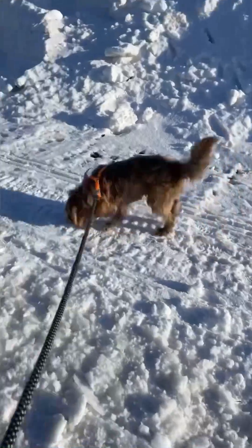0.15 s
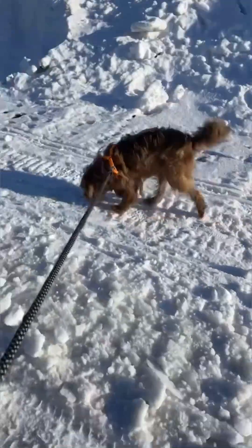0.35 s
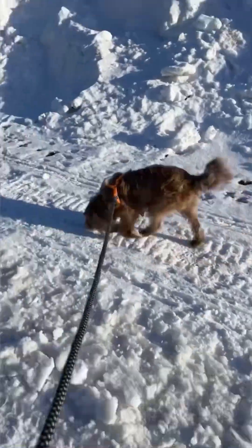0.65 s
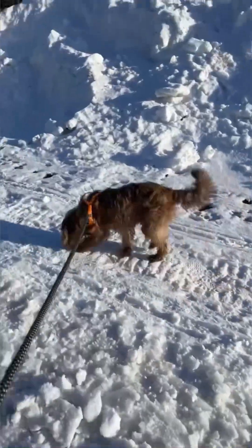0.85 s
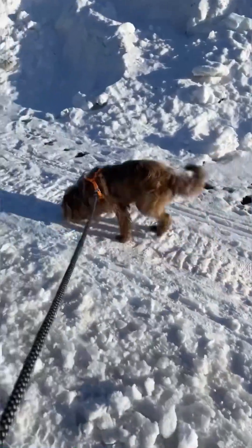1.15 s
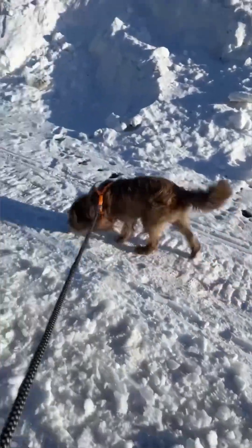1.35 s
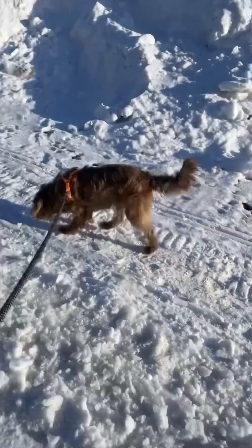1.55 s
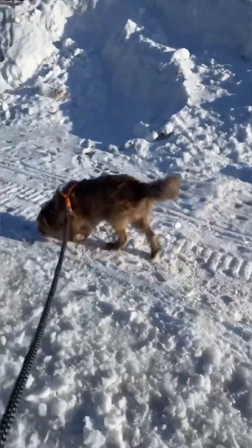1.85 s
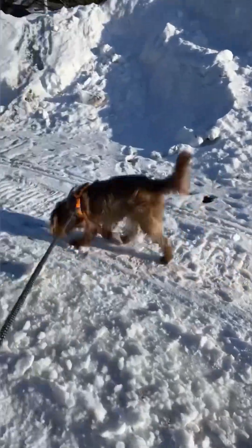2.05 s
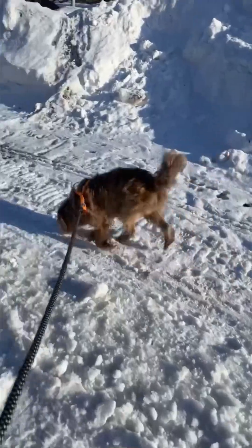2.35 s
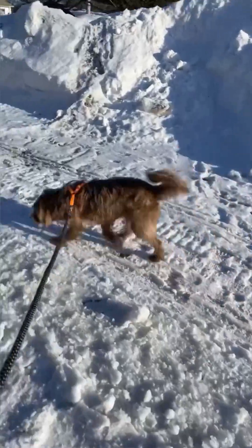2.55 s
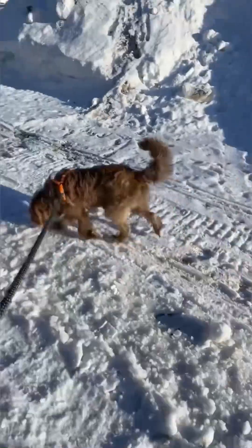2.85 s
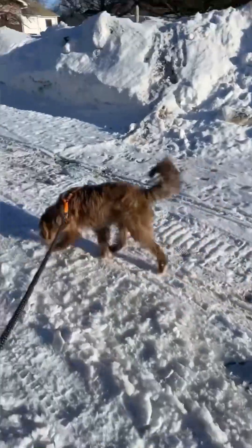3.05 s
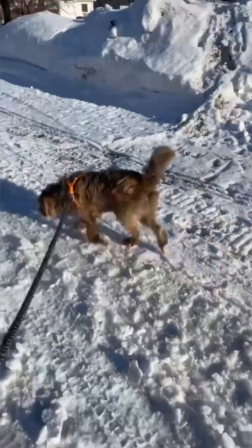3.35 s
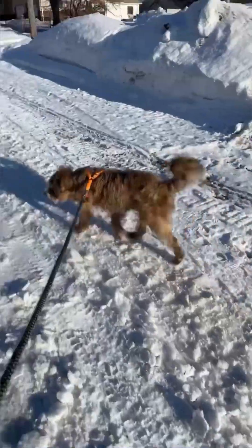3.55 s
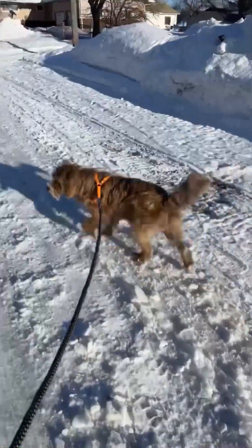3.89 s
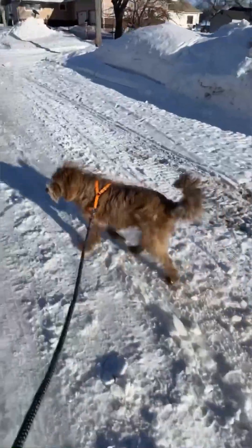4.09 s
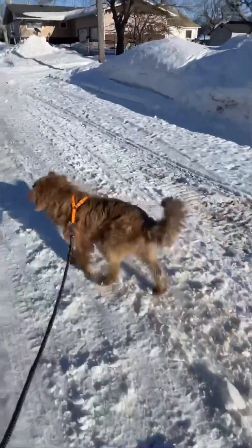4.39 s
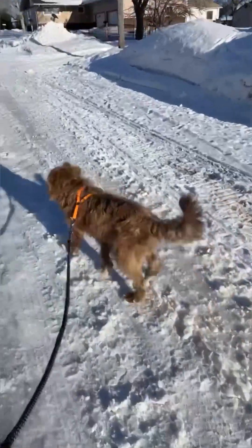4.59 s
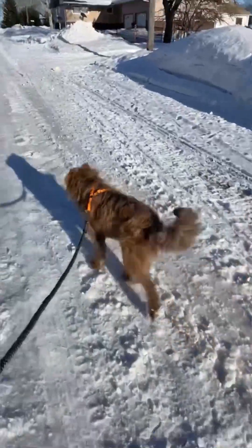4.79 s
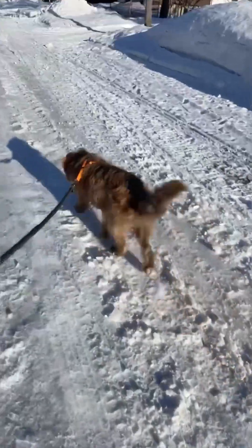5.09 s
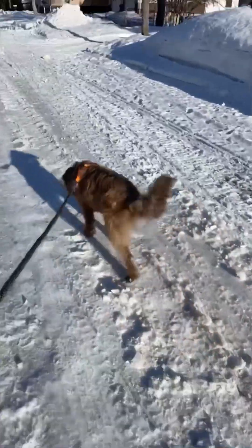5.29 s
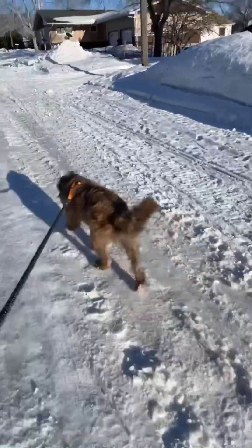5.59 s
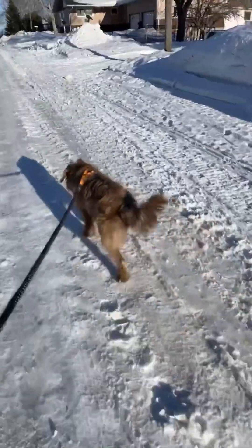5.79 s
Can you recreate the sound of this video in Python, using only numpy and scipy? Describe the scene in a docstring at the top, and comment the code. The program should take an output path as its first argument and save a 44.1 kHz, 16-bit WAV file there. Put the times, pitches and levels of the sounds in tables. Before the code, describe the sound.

Steady walking on a packed snowy road, heard on a handheld phone. Each boot gives a gritty crunch with sharp crust snaps and powdery hiss, then small scuffs. A coat swishes between steps, air rumbles softly, and a faint far engine hums low. The loudest crack comes near 3.8 seconds; the last steps are softer. Open air, no echo.

```python
"""Boots walk a road of cold packed snow, heard from a phone in the hand.
Each boot crushes crust, grit and powder as swarms of tiny random fractures under a swelling load.
Lumps snap in single quick swings of pressure, and ice chips ring in short bursts of high modes.
Between them lie filtered noises: a winter coat swishes, loose snow shuffles, air rumbles on the microphone.
A far engine hums as one sine that slowly rises in pitch."""
import sys
import numpy as np
from scipy import signal
from scipy.fft import rfft, irfft, next_fast_len
from scipy.io import wavfile
from scipy.ndimage import uniform_filter1d

SR = 44100
rng = np.random.default_rng(int(sys.argv[2]) if len(sys.argv) > 2 else 0)


def persist_wave(psi):
    """Save psi, clipped to +-1, as 16-bit WAV."""
    counts = np.round(np.clip(psi, -1, 1) * 32767).astype(np.int16)
    wavfile.write(sys.argv[1], SR, np.atleast_2d(counts).T)


N = 261513
TIME = np.arange(N) / SR
TOP_HZ = 16000  # upper limit of the phone

# Footfalls of the boots. Each row: full load in seconds, rise in seconds, fall in seconds, crust in dB,
# grit in dB, powder in dB, crust pitch in Hz, typical strength in dB of the push-off lumps before it.
FOOTFALLS = [(.229, 0.083, 0.046, -21.5, -23.5, -21.5, 902.3, -33),
             (0.846, 0.038, .037, -17.5, -24, -25, 1058, -29),
             (1.433, 0.051, 0.046, -22, -25.5, -26.5, 1001, -17),
             (2.06, 0.03, .035, -21, -28.5, -30, 1012, -25.5),
             (2.623, .027, 0.035, -17, -21, -26, 988, -19.5),
             (3.216, 0.016, 0.034, -23, -30.5, -43, 1117, -27.5),
             (3.811, 0.0218, 0.018, -18.5, -32, -26.5, 1197, -23),
             (4.421, .03, 0.055, -26, -38.5, -43.5, 1302, -27),
             (4.922, 0.04, 0.03344, -33, -29.5, -47, 1102, -32.5),
             (5.535, 0.041, 0.034, -23.5, -30.5, -35, 1056, -40)]
# Colour of breaking crust. Each row: frequency in Hz, relative level in dB.
CRUST_COLOUR = [(60, -25.5), (160, -12.5), (300, -10), (520, -8), (760, -2), (1080, 0.5), (1400, -6.5),
                (2200, -12.5), (3500, -18.5), (8000, -67)]


def undb(db):
    """Decibels to gain."""
    return 10 ** (np.asarray(db) / 20)


def unit(x):
    """Scale to rms 1."""
    return x / np.sqrt(np.mean(x ** 2))


def curves(table):
    """Each column of a table as a line through time."""
    s, *columns = np.transpose(table)
    return [np.interp(TIME, s, c) for c in columns]


def add(track, s, sound):
    """Mix a sound into a track from time s on."""
    i = max(int(s * SR), 0)
    track[i:i + len(sound)] += sound[:max(N - i, 0)]


def colour(x, points, size=8192):
    """Minimum-phase filter through (Hz, dB) points, by way of the cepstrum; the result has rms 1."""
    hz, db = np.transpose(points)
    f = np.maximum(np.arange(size // 2 + 1) * SR / size, 1)
    log_gain = np.log(undb(np.interp(np.log(f), np.log(hz), db)))
    cepstrum = irfft(log_gain)
    # fold the cepstrum forward in time so that the filter is causal
    cepstrum[1:size // 2] *= 2
    cepstrum[size // 2 + 1:] = 0
    response = irfft(np.exp(rfft(cepstrum)))
    return unit(signal.fftconvolve(x, response)[:N])


def walk(rate):
    """Smooth random wander with rms 1, taking rate new values a second."""
    k = max(int(SR / rate), 1)
    held = np.repeat(rng.standard_normal(N // k + 1), k)
    return unit(uniform_filter1d(held, k)[:N])


def fractures(rate, spread_db):
    """Random impulses, rate a second on average: many small ones and a few large."""
    size = undb(spread_db * np.minimum(rng.exponential(size=N), 4))
    struck = rng.random(N) < rate / SR
    return struck * size * rng.choice([-1, 1], N)


def wavelet(hz, cycles):
    """One short swing of pressure at a random phase, centred in its array."""
    half = int(2 * SR * cycles / hz * 2)
    turns = np.arange(-half, half + 1) * hz / SR
    return np.exp(-.5 * (turns / cycles) ** 2) * np.sin(2 * np.pi * (turns + rng.random()))


def patchy(x, depth_db, rate, count=16):
    """Grain sizes keep changing: each narrow band swells and fades by itself; the result has rms 1."""
    size = next_fast_len(N, True)
    spectrum, out = rfft(x, size), np.zeros(N)
    log_hz = np.log1p(np.arange(len(spectrum)) * SR / size)
    place = np.interp(log_hz, np.log([300, TOP_HZ]), [0, count - 1])
    for k in range(count):
        band = irfft(spectrum * np.maximum(1 - np.abs(place - k), 0), size)[:N]
        out += band * undb(depth_db * walk(rate))
    return unit(out)


def swell(s, width_s):
    """A smooth rise to 1 at time s and back."""
    return np.exp(-.5 * ((TIME - s) / width_s) ** 2)


def stride():
    """The body swings through each step, peaking just after full load."""
    return sum(swell(s + 0.036, width_s=0.059) for s, *_ in FOOTFALLS)


def coat():
    """Cloth rubs in a dense swarm of tiny catches and swishes louder with the stride."""
    # Colour of the swish. Each row: frequency in Hz, relative level in dB.
    coat_colour = [(400, -24), (1500, -4), (3000, 1), (4200, 3), (5200, 2.5), (6500, 2.5), (8100, 6.5),
                   (9600, -3), (12500, 0), (16000, -5)]
    # Course of the swish before trim, stride and wander. Each row: time in seconds, level in dB.
    coat_course = [(0.0, -45), (0.2, -39.5), (0.51, -45.5), (1.24, -45), (1.39, -42), (2.36, -46),
                   (2.69, -43.5), (2.89, -45.5), (3.1, -49), (3.24, -46.5), (3.6, -40), (3.75, -41),
                   (3.96, -46), (4.94, -46), (5.1, -53.5), (5.33, -53), (5.66, -51), (5.93, -49)]
    trim_db, stride_db = -.5, 5
    level_db = curves(coat_course)[0] + stride_db * stride() + trim_db
    cloth = patchy(colour(fractures(rate=6500, spread_db=4.0), coat_colour), depth_db=2.5, rate=25)
    return cloth * undb(level_db + 2.07 * walk(70))


def shuffle():
    """Loose snow shifts as uneven dull noise that swells a little with the stride."""
    # Colour of shifting snow. Each row: frequency in Hz, relative level in dB.
    shuffle_colour = [(70, -8), (130, -6), (220, 2), (450, -0.5), (900, -2), (1500, -5.5), (2300, -11),
                      (5000, -24.5)]
    # Course of the shuffle before trim, stride and wander. Each row: time in seconds, level in dB.
    shuffle_course = [(0, -47), (.5, -47.5), (.95, -44), (1.35, -47.5), (1.75, -44.5), (2.0, -51),
                      (2.65, -46), (2.95, -53.5), (3.7, -48.5), (4.03, -52.5), (4.28, -47), (4.6, -51),
                      (5.0, -48), (5.2, -53), (5.33, -46.5), (5.7, -50), (5.93, -42.5)]
    trim_db, stride_db = 3.5, 2.5
    level_db = curves(shuffle_course)[0] + stride_db * stride() + trim_db
    loose_snow = patchy(colour(rng.standard_normal(N), shuffle_colour), depth_db=3.0, rate=50)
    return loose_snow * undb(level_db + 2.0 * walk(45))


def crackle():
    """Fine specks crack sparsely underfoot, at a level that comes and goes."""
    # Colour of the specks. Each row: frequency in Hz, relative level in dB.
    crackle_colour = [(300, -13), (900, -13), (1700, -3), (3000, -6), (7000, -30), (16000, -18)]
    # Course of the crackle. Each row: time in seconds, level in dB.
    crackle_course = [(0, -59), (1.2, -59), (2.4, -49), (3.0, -55.5), (4.4, -62), (5.25, -63),
                      (5.93, -47.5)]
    specks = colour(fractures(rate=110, spread_db=3.8), crackle_colour)
    return patchy(specks, depth_db=5.0, rate=110) * undb(curves(crackle_course)[0])


def air():
    """Air nudges the microphone: low noise wanders in level, with a few soft puffs."""
    # Colour of the rumble. Each row: frequency in Hz, relative level in dB.
    air_colour = [(20, -22), (38, -5.5), (55, 1.5), (90, -3), (130, -6), (250, -14), (1000, -38.5)]
    # Puffs of air. Each row: centre in seconds, half width in seconds, lift over the rumble in dB.
    air_puffs = [(1.73, 0.13, 7.5), (2.78, 0.078, 3), (4.129, 0.045, 4.5), (5.75, .2, 4)]
    level_db = -52.5 + sum(db * swell(s, width) for s, width, db in air_puffs)
    return colour(rng.standard_normal(N), air_colour) * undb(level_db + 2.2 * walk(15))


def engine():
    """Only the firing note of the far engine carries over the snow."""
    # Far engine, before the level wanders. Each row: time in seconds, firing rate in Hz, level in dB.
    engine_course = [(0, 78.3, -51), (.8, 82, -51), (1.3, 82.5, -50), (2.0, 86.8, -48), (2.15, 88.5, -61),
                     (3.1, 91, -56.5), (5.93, 91, -64.5)]
    hz, db = curves(engine_course)
    note = unit(np.sin(2 * np.pi * np.cumsum(hz) / SR))
    return note * undb(db + 0.43 * walk(6.7))


def load(full, rise, fall, edge_db, release_s):
    """Weight builds on the snow and eases; outside the contact the crushing dies within milliseconds."""
    near = np.abs(TIME - full) < .25
    t = TIME[near] - full
    outside = np.maximum(np.maximum(-rise - t, t - fall), 0)
    press_db = np.interp(t, [-rise, 0, fall], [edge_db, 0, edge_db])
    gain = np.zeros(N)
    gain[near] = undb(press_db) * np.exp(-outside / release_s)
    return gain


def metered(x, size=900):
    """A given load breaks only so much snow: grains close to a big fracture are smaller."""
    return unit(x / np.sqrt(uniform_filter1d(x ** 2, size) + 1e-9))


def contacts():
    """Every press of a boot: full load, rise, fall (s), crust, grit, powder (dB), crust pitch (Hz)."""
    # Light contacts with the snow: mostly a heel or toe scuffing it, and at 4.51 s a longer soft tail after #
    # the footfall. Each row: full load in seconds, length in seconds, crust in dB, powder in dB, crust pitch in
    # Hz.
    light_contacts = [(.33, .032, -31.5, -27.5, 941), (0.689, 0.023, -24.5, -35.5, 911.6),
                      (1.182, 0.026, -26, -34, 1030), (1.221, .022, -29, -43, 1203),
                      (1.272, 0.032, -28.5, -31, 1212), (1.379, 0.025, -29.5, -30, 1190),
                      (1.542, 0.077, -34, -40, 1085), (1.62, 0.034, -30.5, -40.5, 1132),
                      (2.008, 0.046, -50, -34.5, 1073), (2.131, .05, -38, -45, 1419),
                      (2.527, 0.018, -29.5, -34, 1393), (2.806, 0.01643, -55.5, -32, 1270),
                      (3.068, 0.026, -31.5, -30, 1261), (3.123, 0.15, -43, -36.5, 1244),
                      (3.263, 0.025, -24, -59, 1105), (3.295, 0.013, -35, -31.5, 1408),
                      (3.372, 0.021, -39.5, -30.5, 1367), (3.586, 0.034, -32.5, -28, 1499),
                      (3.789, 0.032, -28.5, -35, 1688), (3.845, 0.024, -30.5, -30, 1369),
                      (3.881, 0.017, -25.5, -31, 1490), (4.18, 0.015, -50.5, -31, 1504),
                      (4.395, 0.0231, -32.5, -39, 1380), (4.51, .12, -47.5, -44, 1215),
                      (4.966, 0.055, -33.5, -60, 1218), (5.026, 0.016, -25.5, -44, 1013),
                      (5.084, 0.069, -44, -41, 1122)]
    footfalls = [step[:-1] for step in FOOTFALLS]
    # the sole rolls flat after every footfall, with a softer crunch
    lag_s, roll = .09, (.03, .08, -43, -49, -58, 1302.3)
    rolls = [(s + lag_s, *roll) for s, *_ in FOOTFALLS]
    rise_share = .4  # of a scuff's length
    grit_offset_db = -2  # against the mean of crust and powder
    scuffs = []
    for s, length, crust_db, powder_db, hz in light_contacts:
        grit_db = (crust_db + powder_db) / 2 + grit_offset_db
        rise, fall = rise_share * length, (1 - rise_share) * length
        scuffs.append((s, rise, fall, crust_db, grit_db, powder_db, hz))
    return footfalls + rolls + scuffs


def crunches():
    """Crust breaks in coarse dull grains, grit rasps, powder hisses; all three give way in the same jerks."""
    # Colours of grit and of powder. Each row: frequency in Hz, relative level in dB.
    grit_colour = [(500, -44), (1500, -5.5), (2700, -1), (3500, -1.5), (4300, -4.5), (5400, -0.5),
                   (6600, -7.5), (9000, -13), (16000, -28)]
    powder_colour = [(1000, -29), (4500, -9), (6500, -2), (8000, 6), (9600, -3.5), (13000, 0),
                     (14200, -3.5), (15700, -8)]
    crust_hz = 1000  # pitch at which the crust grains run at their own speed
    loads, pitch_sum, weight = np.zeros((3, N)), np.full(N, 1e-6 * crust_hz), np.full(N, 1e-6)
    for full, rise, fall, *db, hz in contacts():
        press = undb(db)[:, None] * load(full, rise, fall, edge_db=-12.5, release_s=.004)
        packing = np.clip((TIME - full) / (rise + fall), -1, 1)
        loads += press
        pitch_sum += press[0] * hz * (1 + .15 * packing)  # the crust stiffens as it packs, so its pitch climbs
        weight += press[0]
    crust = patchy(colour(fractures(rate=1400, spread_db=3.0), CRUST_COLOUR), depth_db=2.5, rate=70)
    # finer or coarser crust: the same grains, run faster or slower
    speed = pitch_sum / weight / crust_hz
    crust = np.interp(np.cumsum(speed) % N, np.arange(N), crust)
    grit = patchy(colour(fractures(rate=2600, spread_db=2.0), grit_colour), depth_db=3.0, rate=64)
    powder = patchy(colour(fractures(rate=5900, spread_db=0.5), powder_colour), depth_db=3.0, rate=70)
    jerks = undb(1.85 * walk(260))
    grains = [metered(layer * jerks) for layer in (crust, grit, powder)]
    return (loads * grains).sum(axis=0)


def push_off_lumps(count):
    """More lumps, soft to middling, break at random as the rear boot pushes off: time (s), dB, pitch (Hz)."""
    lead_s, spread_s = .17, 0.097  # ahead of the next footfall
    s, *_, db = np.repeat(FOOTFALLS, count, axis=0).T
    when, strength, pitch = rng.standard_normal((len(s), 3)).T
    times = s - lead_s + spread_s * when
    pitches = 1560 * 2 ** (0.31 * pitch)  # centre in Hz, spread in octaves
    return list(zip(times, db + 1.5 * strength, pitches))


def snaps():
    """A lump breaks with one quick swing and a spray of splinters; its crumbs settle for a few milliseconds."""
    # Lumps of crust breaking at set times. Each row: time in seconds, strength in dB, pitch in Hz.
    set_lumps = [(.2267, -13, 1030), (.2656, -14.5, 2560), (.3295, -14, 920), (.6502, -15.5, 1150),
                 (.6859, -10.5, 1010), (.6895, -7.5, 844), (.9675, -12.5, 1470), (1.0184, -6, 1907),
                 (1.159, -15.5, 1930), (1.2476, -13, 2100), (1.3687, -15.5, 1070), (1.4684, -9.5, 890),
                 (1.4911, -15.5, 1712), (1.7572, -12.5, 1500), (1.9611, -21.5, 1250), (2.1623, -17, 1480),
                 (2.1833, -17.5, 1490), (2.2684, -15.5, 1720), (2.3978, -17, 1620), (2.4517, -13, 2640),
                 (2.4619, -18, 2394), (2.4883, -18, 2720), (2.5007, -14, 2904), (2.5209, -18, 2110),
                 (2.5618, -15.5, 3477), (2.5833, -17, 2608), (2.6464, -6, 945), (3.0085, -23, 2053),
                 (3.2169, -13.5, 1332), (3.2665, -13, 1069), (3.2942, -22, 1580), (3.3241, -17, 1560),
                 (3.5899, -2, 1697), (3.6547, -14, 1500), (3.786, -9, 2927), (3.7934, -12, 2795),
                 (3.8062, -8, 1698), (3.8202, 1, 1180), (3.8223, -0.5, 1278), (3.8268, -3.5, 1349),
                 (3.8826, -12, 1830), (3.904, -17, 684), (4.0613, -23.5, 1809), (4.1593, -21, 1750),
                 (4.2312, -22, 2360), (4.2417, -18, 1400), (4.2669, -8.5, 1430), (4.2754, -3.5, 1650),
                 (4.2979, -12.5, 991), (4.3589, -10, 2330), (4.3604, -15.5, 800), (4.4164, -12, 1532),
                 (4.423, -18, 1402), (4.7801, -26.5, 2324), (4.9207, -16, 2895), (4.9373, -13.5, 3049),
                 (4.9998, -12, 1452), (5.0359, -20.5, 1250), (5.1052, -24.5, 1363), (5.5575, -16, 1180),
                 (5.9129, -23, 2140)]
    # Colour of the splinters. Each row: frequency in Hz, relative level in dB.
    splinter_colour = [(400, -34), (1500, 1), (3000, -4.5), (5500, -1.5), (8000, -14), (16000, -57)]
    breaks, settling, spray = np.zeros(N), np.zeros(N), np.zeros(N)
    after = TIME[:SR // 20]
    for s, db, hz in list(set_lumps) + push_off_lumps(count=5):
        swing = undb(db) * wavelet(hz, cycles=0.45)
        add(breaks, s - len(swing) / 2 / SR, swing)
        # the crack opens fast, ahead of the main swing
        edge = undb(db - 13) * wavelet(hz=2720, cycles=0.75)
        add(breaks, s - 0.54 / hz - len(edge) / 2 / SR, edge)
        add(settling, s, undb(db) * np.exp(-after / 0.0042))
        # higher-pitched lumps spray more splinters for their strength
        add(spray, s - .0004, undb(db) * (hz / 2200) ** 2 * np.exp(-after / 0.0012))
    crumbs = settling * patchy(colour(rng.standard_normal(N), CRUST_COLOUR), depth_db=4.0, rate=80)
    splinters = spray * colour(rng.standard_normal(N), splinter_colour)
    return undb(-0.67) * breaks + undb(-18.5) * crumbs + undb(-15.0) * splinters


def bumps():
    """Air and heel bump softly: ragged thumps of a cycle or two."""
    # Low bumps, before they turn ragged. Each row: time in seconds, strength in dB, pitch in Hz.
    low_bumps = [(0.839, -29, 165), (1.134, -29.5, 210), (1.675, -29, 150.4), (1.71, -22.5, 60.97),
                 (1.742, -31, 61.95), (2.75, -40, 65), (2.928, -42, 79.9), (3.248, -26, 234),
                 (3.822, -20, 298.4), (3.83, -36.5, 142.7), (4.15, -37.5, 58.3), (4.205, -32, 300.4),
                 (4.93, -40.5, 62.03), (5.302, -33, 62)]
    out = np.zeros(N)
    for s, db, hz in low_bumps:
        swing = undb(db) * wavelet(hz, cycles=0.7)
        add(out, s - len(swing) / 2 / SR, swing)
    return out * undb(3.54 * walk(200))


def chips():
    """Each chip rings briefly in a dense cluster of high modes and bounces once right away."""
    # Ice chips knocked by the boot. Each row: time in seconds, peak of the first ring in dB, pitch in Hz.
    ice_chips = [(2.876, -10, 7100), (2.883, -17, 7200), (4.174, -21, 8438), (4.2629, -10, 6430),
                 (4.705, -15.5, 7200), (4.7487, -23.5, 7920), (4.999, -17, 5490)]
    t60_s = 0.0089  # time to fall by 60 dB
    out, t = np.zeros(N), TIME[:SR // 20]
    for s, db, hz in ice_chips:
        octaves = np.log2(np.maximum(np.fft.rfftfreq(len(t), 1 / SR), 1) / hz)
        cluster = 1 / (1 + (octaves / 0.34) ** 2) * (octaves > -1.3)
        modes = irfft(rfft(rng.standard_normal(len(t))) * cluster, len(t))
        ring = modes * np.exp(-np.log(1000) * t / t60_s)
        ring *= undb(db) / np.abs(ring).max()
        add(out, s, ring)
        add(out, s + .0008, 0.35 * ring)
    return out


def scene():
    """Open air over snow gives no echo, so the sources simply add."""
    surroundings = coat() + shuffle() + crackle() + air() + engine()
    return (surroundings + crunches() + snaps() + bumps() + chips())[None]


def record(dry):
    """The phone cuts the top with a steep low-pass."""
    return signal.sosfilt(signal.ellip(10, .2, 80, TOP_HZ, fs=SR, output="sos"), dry)


dry = scene()
out = record(dry)
persist_wave(out)
```